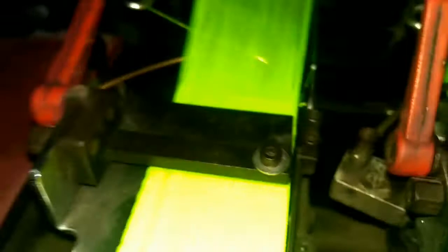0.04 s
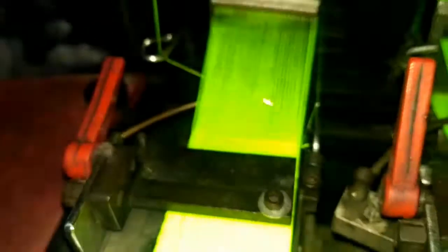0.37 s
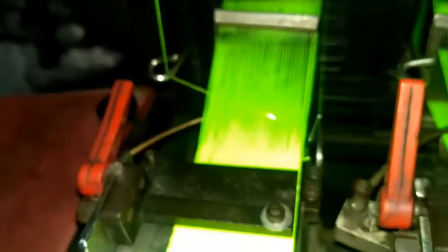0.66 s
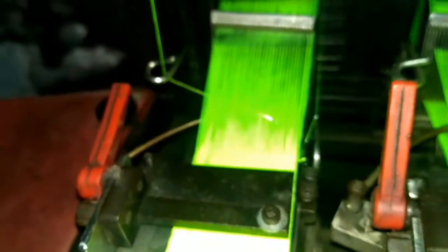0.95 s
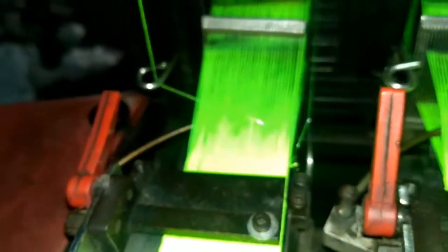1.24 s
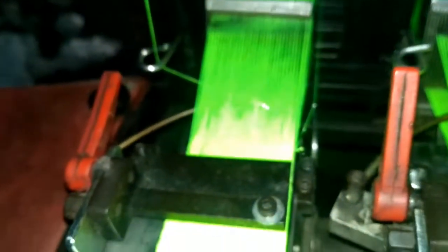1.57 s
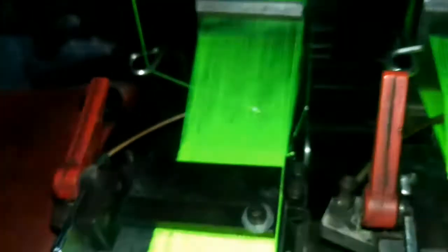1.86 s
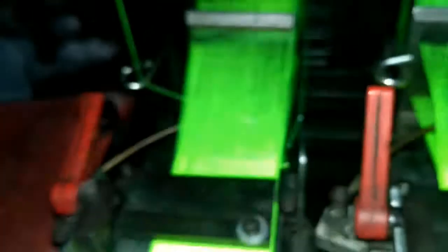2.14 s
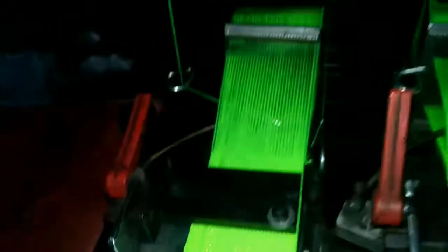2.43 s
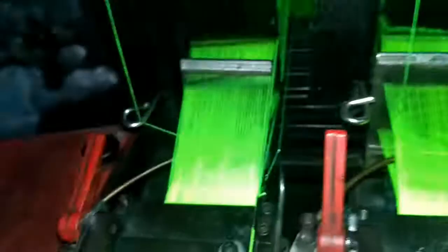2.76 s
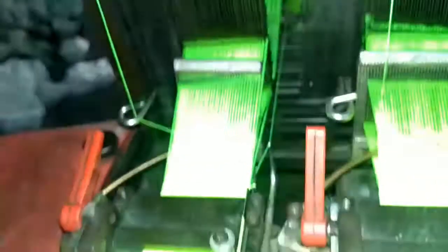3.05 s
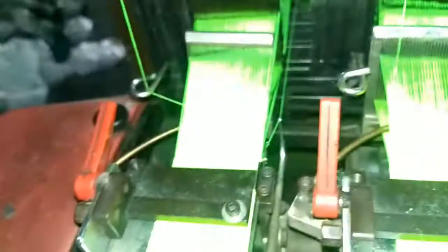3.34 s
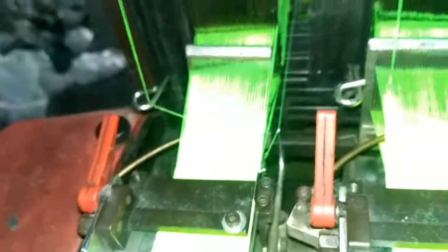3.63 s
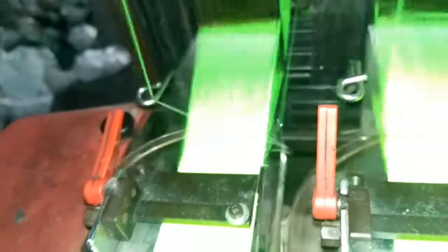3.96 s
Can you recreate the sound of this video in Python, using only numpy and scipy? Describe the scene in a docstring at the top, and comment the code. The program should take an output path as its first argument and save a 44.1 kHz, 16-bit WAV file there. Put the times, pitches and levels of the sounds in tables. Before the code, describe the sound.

In a rumbling factory, a loom beats evenly with a thin, high thread whistle. A loud, close clack and a brush against the microphone briefly push the noise down; it creeps back before a squeak and bright scraping.

```python
"""A needle loom weaves tape in a rumbling mill. From the start it rattles nearly three times a second,
its thread whistles thinly every second beat, loose steel clinks and another mechanism sizzles.
Near 2 s a sharp clack right at the microphone makes the recorder turn itself down, and something
brushes the microphone with a swish. The volume creeps back up while the loom keeps beating.
From 3.7 s rubbing makes a hollow squeak, and close scraping ends the scene."""
import sys
import numpy as np
from scipy import signal
from scipy.fft import rfft, irfft
from scipy.io import wavfile
from scipy.ndimage import uniform_filter1d

SR = 44100
rng = np.random.default_rng(int(sys.argv[2]) if len(sys.argv) > 2 else 0)


def dump(signal):
    """Clip the signal to [-1, 1] and save it as 16-bit WAV at the path in sys.argv[1]."""
    limited = np.clip(np.atleast_2d(signal).T, -1, 1)
    pcm = np.round(limited * 32767).astype(np.int16)
    wavfile.write(sys.argv[1], SR, pcm)


N = 176400
TIME = np.arange(N) / SR


def from_db(db):
    """Turn decibels into a multiplier."""
    return 10 ** (np.asarray(db) / 20)


def unit_power(x):
    """Scale a sound to an average power of 1."""
    return x / np.sqrt(np.mean(x ** 2) + 1e-20)


def colour(x, spectrum):
    """Make some pitches stronger than others, then scale to power 1."""
    hz, db = np.transpose(spectrum)
    bin_hz = np.maximum(np.arange(N // 2 + 1) * SR / N, 1)
    gain = from_db(np.interp(np.log(bin_hz), np.log(hz), db))
    return unit_power(irfft(rfft(x) * gain, N))


def hiss():
    """White noise: all pitches at once."""
    return rng.standard_normal(N)


def grains(per_s, spread_db):
    """Tiny contacts of uneven size at random moments."""
    hits = (rng.random(N) < per_s / SR) * rng.choice([-1, 1], N)
    return hits * from_db(spread_db * np.minimum(rng.exponential(1, N), 4))


def drift(rate_hz):
    """A smooth random wobble of power 1."""
    r = np.exp(-2 * np.pi * rate_hz / SR)
    return unit_power(signal.lfilter([1], [1, -2 * r, r * r], rng.standard_normal(N + SR))[SR:])


def breathy_tone(phase, width_hz):
    """A narrow band of noise around one pitch."""
    return unit_power(drift(width_hz) * np.cos(phase) + drift(width_hz) * np.sin(phase))


def bursts(rows, sound, rise_s, hold_s, fade_s):
    """For each (start_s, level_db) row the sound rises, holds, then falls 60 dB in fade_s."""
    out = np.zeros(N)
    for start_s, level_db in rows:
        age = TIME - start_s
        fade = from_db(-60 * np.clip((age - rise_s - hold_s) / fade_s, 0, 2))
        envelope = np.clip(age / rise_s, 0, 1) * fade
        out += from_db(level_db) * unit_power(envelope * sound) * np.sqrt(np.mean(envelope ** 2))
    return out


def level_curve(rows):
    """A volume that follows (time_s, level_db) points and stops just after the last."""
    s, db = np.transpose(rows)
    return from_db(np.interp(TIME, s, db)) * (TIME >= s[0]) * (TIME <= s[-1] + .05)


# echoes off nearby steel: delay_s, gain_db
ECHOES = [(.0031, -21.5), (.0074, -18), (0.013, -16.5), (0.019, -19), (0.03, -17.5)]

def with_echoes(x):
    """Sound bounces off the machines, adding quieter, late copies."""
    return x + sum(from_db(db) * np.interp(TIME - delay, TIME, x, left=0) for delay, db in ECHOES)


# tone of the mill's din: pitch_hz, gain_db
DIN_TONE = [(20, -50), (32, -20), (45, -3.5), (62, -3), (110, -5.5), (235, -3.5), (400, -8.5), (500, -5.5),
            (604, -9.5), (770, -7), (1430, -13), (2390, -12), (3300, -13.5), (4220, -14), (5240, -12),
            (7240, -12.5), (8510, -10.5), (12500, -9), (14600, -11), (15800, -17.5)]
# ringing machine frames: pitch_hz, width_hz, level_db
DRONES = [(82.7, 11, -52.5), (322.3, 28, -51), (5340, 110, -55), (2980, 140, -60)]

def mill_din():
    """Many machines blend into one steady noise while their frames drone."""
    din = from_db(-35.5) * colour(hiss(), DIN_TONE)
    return din + sum(from_db(db) * breathy_tone(2 * np.pi * hz * TIME, width) for hz, width, db in DRONES)


# floor thuds and frame throbs: start_s, level_db
THUDS = [(.26, -43), (.98, -40.5), (1.135, -41), (1.35, -40.5), (1.74, -35), (1.925, -40), (2.41, -46),
         (3.22, -40)]
THROBS = [(.73, -39), (2.25, -35.5), (2.53, -39), (2.81, -41.5), (3.04, -44), (3.31, -44), (3.47, -44)]
# their tones: pitch_hz, gain_db
THUD_TONE = [(30, -14), (60, -3), (90, 4), (150, -8.5), (300, -31), (1000, -60)]
THROB_TONE = [(120, -29), (240, -14), (305, 2.5), (370, -13.5), (480, -4.5), (700, -34), (1500, -56)]

def thuds_and_throbs():
    """Dull thuds come through the floor, and the frame gives low throbs."""
    thuds = bursts(THUDS, colour(hiss(), THUD_TONE), rise_s=.0058, hold_s=.021, fade_s=.088)
    throbs = bursts(THROBS, colour(hiss(), THROB_TONE), rise_s=.0087, hold_s=.024, fade_s=.065)
    return thuds + throbs


# light taps: start_s, level_db
TAPS = [(.03, -43), (.655, -39), (2.425, -40), (2.455, -46), (3.05, -45)]
# their tone: pitch_hz, gain_db
TAP_TONE = [(250, -25), (500, 2), (900, -3), (1200, -9), (2500, -31)]

def taps():
    """Faint, hollow taps that die away quickly."""
    return bursts(TAPS, colour(hiss(), TAP_TONE), rise_s=.0032, hold_s=.01, fade_s=.084)


# metallic sizzles: start_s, level_db
SIZZLES = [(.015, -44), (.29, -38), (.585, -33.5), (.865, -36.5), (1.42, -32.5), (1.6, -42), (1.69, -41.5),
           (2.725, -36), (3.01, -38.5), (3.575, -35)]
# their tone: pitch_hz, gain_db
SIZZLE_TONE = [(3000, -19), (4950, -22), (5280, 0.5), (5650, -10), (6200, -1), (7450, 1), (8100, -17),
               (11000, -9), (16000, -32)]

def sizzles():
    """Another mechanism gives off bursts of high, metallic hiss."""
    return bursts(SIZZLES, colour(hiss(), SIZZLE_TONE), rise_s=.016, hold_s=.04, fade_s=.36)


# steel clinks and the sharp ticks inside them: start_s, level_db
CLINKS = [(.025, -38.5), (.735, -36.5), (1.903, -27.5), (3.72, -31)]
TICKS = [(.7435, -34), (1.9065, -23)]
# their tones: pitch_hz, gain_db
CLINK_TONE = [(200, -17), (500, -2), (1100, -16.5), (1850, 7), (2600, -9), (4300, -14.5), (5250, 10),
              (5700, 8), (6500, -13), (11000, -3), (16000, -13)]
TICK_TONE = [(200, -26), (1000, -10), (1750, 6), (2400, 0), (4000, -15), (5400, -12), (8000, -21),
             (14000, -7), (16000, -15)]

def clinks():
    """Loose steel parts rattle together, twice with a sharp tick of contact."""
    ticks = bursts(TICKS, colour(hiss(), TICK_TONE), rise_s=.0009, hold_s=.0021, fade_s=.022)
    rattle = colour(grains(per_s=5000, spread_db=2.5), CLINK_TONE)
    return ticks + bursts(CLINKS, rattle, rise_s=.0032, hold_s=.0062, fade_s=.17)


FIRST_BEAT_S, BEAT_GAP_S = .014, .353
# the thread's whistle over two loom beats: time_in_cycle_s, pitch_hz, level_db
WHISTLE = [(0, 14250, -50), (.03, 14330, -39), (.13, 14620, -39), (.2, 15000, -50), (0.301, 14800, -46),
           (.4, 14790, -56), (.48, 14710, -49), (.6, 14700, -52), (.7, 14500, -62)]

def thread_whistle(cycle_start_s=.485):
    """The running thread whistles, sliding up and sagging again every two beats."""
    s, hz, db = np.transpose(WHISTLE)
    age = (TIME - cycle_start_s) % (2 * BEAT_GAP_S)
    phase = 2 * np.pi * np.cumsum(np.interp(age, s, hz)) / SR
    return from_db(np.interp(age, s, db)) * breathy_tone(phase, width_hz=140)


# strength of each loom beat in turn: level_db
BEAT_LEVELS = [-38, -35, -39.5, -36, -37, -35.5, -43, -39, -37.5, -36, -47.5, -35]
# tone of a beat: pitch_hz, gain_db
BEAT_TONE = [(200, -19), (500, -7), (1200, -12.5), (1750, -5.5), (2050, -1), (2200, -4), (2420, 6),
             (2650, 1), (3200, 0.5), (4200, -10.5), (5300, -6.5), (6500, -11.5), (10000, -3.5),
             (15000, -15.5)]

def loom_beats():
    """The loom beats evenly, each beat a rattle of many tiny contacts."""
    beats = [(FIRST_BEAT_S + k * BEAT_GAP_S, db) for k, db in enumerate(BEAT_LEVELS)]
    rattle = colour(grains(per_s=1300, spread_db=1.5), BEAT_TONE)
    return bursts(beats, rattle, rise_s=.0095, hold_s=.035, fade_s=.56)


# rough rubs that drive the squeaks: start_s, level_db
RUBS = [(3.745, -30), (3.795, -38), (3.835, -41)]
# their tone: pitch_hz, gain_db
RUB_TONE = [(200, -27), (450, -0.5), (900, 3), (1250, -3.5), (1500, -8), (1850, -7), (2600, -19),
            (5000, -38)]
# hollow squeaks: start_s, length_s, pitch_hz, level_db
SQUEAKS = [(3.707, 0.02, 760, -32.5), (3.73, .024, 758, -16.5), (3.738, .027, 480, -28),
           (3.755, 0.03, 1100, -43), (3.764, 0.0099, 820, -29), (3.774, 0.044, 780, -38.5)]

def squeaks(edge_s=.0052, wobble=.04, overtone_db=-33):
    """Rubbing surfaces stick and slip, making brief, nearly pure tones that waver."""
    rubbing = colour(grains(per_s=5000, spread_db=2.5), RUB_TONE)
    out = bursts(RUBS, rubbing, rise_s=.0057, hold_s=.017, fade_s=.051)
    for start_s, length_s, hz, db in SQUEAKS:
        envelope = np.clip(np.minimum(TIME - start_s, start_s + length_s - TIME) / edge_s, 0, 1)
        phase = 2 * np.pi * np.cumsum(hz * (1 + wobble * drift(80))) / SR
        tone = np.sin(phase) + from_db(overtone_db) * np.sin(2 * phase)
        out += from_db(db) * envelope * unit_power(tone)
    return out


# loudness of the scrape: time_s, level_db
SCRAPE = [(3.83, -37), (3.845, -23), (3.856, -11), (3.878, -8), (3.898, -3.5), (3.92, -11), (3.945, -17),
          (3.954, -9), (3.97, -7), (3.986, -7.5), (4.0, -3.5)]
# moments when it catches: start_s, level_db
CATCHES = [(3.8455, -16), (3.8495, -13), (3.86, -8), (3.866, -6), (3.952, -10)]
# their tones: pitch_hz, gain_db
SCRAPE_TONE = [(100, -32), (700, -23), (2000, -21), (3500, -19), (4400, -6.5), (5500, -11.5), (8000, -7.5),
               (10500, -3.5), (12500, 6), (14500, -7), (16000, 2)]
CATCH_TONE = [(300, -41), (2200, -14), (3500, -13.5), (4600, 2.5), (6200, -2), (8200, 1.5), (11500, 8),
              (13000, -3), (16000, -5)]

def scraping():
    """Bright, grainy friction near the microphone clicks each time it catches."""
    grit = grains(per_s=6000, spread_db=3) + .34 * hiss()
    friction = colour(with_echoes(grit), SCRAPE_TONE)
    catches = bursts(CATCHES, colour(hiss(), CATCH_TONE), rise_s=.00084, hold_s=.0017, fade_s=.034)
    return level_curve(SCRAPE) * friction + catches


# loudness of the swish: time_s, level_db
SWISH = [(1.975, -28), (1.998, -10.5), (2.03, -16.5), (2.07, -29), (2.11, -47)]
# its tone: pitch_hz, gain_db
SWISH_TONE = [(300, -22), (2000, -19), (4400, -16), (5400, -4), (8000, -1), (12500, 0.5), (15000, -2),
              (16000, -9)]

def swish():
    """Just after the clack, something brushes the microphone with a bright hiss."""
    return level_curve(SWISH) * colour(hiss(), SWISH_TONE)


# tone of the clack: pitch_hz, gain_db
CLACK_TONE = [(100, -45), (550, -5), (1000, -8.5), (1700, -7.5), (3000, -8), (4300, -2), (5500, -4.5),
              (7500, -4.5), (11000, -1), (14500, -6.5), (16000, -7.5)]
# notes the struck part rings with: pitch_hz, gain_db, fade_s
CLACK_NOTES = [(545, -14.5, 0.12), (1670, -16, 0.14), (3000, -42, 1.8), (4040, -5.5, 0.096),
               (4305, 6.5, 0.039), (7590, 1, 0.057), (9760, -5, 0.055), (10640, -10, .06)]

def clack(slide_s=1.961, slide_db=-21, blow_s=1.9672, blow_db=2, ring_db=-1.5):
    """A brief slide ends in a hard blow, and the struck part rings."""
    crack = colour(hiss(), CLACK_TONE)
    out = bursts([(slide_s, slide_db)], crack, rise_s=.004, hold_s=.0021, fade_s=.0085)
    out += bursts([(blow_s, blow_db)], crack, rise_s=.00079, hold_s=.0054, fade_s=.052)
    age = np.maximum(TIME - blow_s, 0)
    for hz, gain_db, fade_s in CLACK_NOTES:
        level_db = ring_db + gain_db - 60 * np.minimum(age / fade_s, 2)
        out += from_db(level_db) * np.sin(2 * np.pi * hz * age)
    return out


def scene():
    """The echoing mill and the close sounds reach one microphone, the same in both channels."""
    background = mill_din() + thuds_and_throbs() + taps() + sizzles() + clinks()
    loom = thread_whistle() + loom_beats()
    close = squeaks() + scraping() + swish() + clack()
    return np.tile(with_echoes(background + loom) + close, (2, 1))


THRESHOLD_DB, LISTEN_S, TURN_DOWN_S, RECOVER_DB_PER_S = -15, .011, .0043, 8
CEILING, CUTOFF_HZ = .82, 15850

def record(dry):
    """The recorder turns down fast on loud sounds, recovers slowly and cuts the highest treble."""
    power = uniform_filter1d(dry[0] ** 2, int(LISTEN_S * SR))
    too_loud_db = np.maximum(10 * np.log10(np.maximum(power, 1e-12)) - THRESHOLD_DB, 0)
    recovery_db = RECOVER_DB_PER_S * TIME
    held_db = np.maximum.accumulate(too_loud_db + recovery_db) - recovery_db
    r = np.exp(-1 / (TURN_DOWN_S * SR))
    cut_db = signal.lfilter([1 - r], [1, -r], held_db)  # smooths the drop
    rounded = CEILING * np.tanh(dry * from_db(-cut_db) / CEILING)  # softens the peaks
    return signal.sosfilt(signal.ellip(12, .1, 90, CUTOFF_HZ, fs=SR, output="sos"), rounded)


dry = scene()
out = record(dry)
dump(out)
```